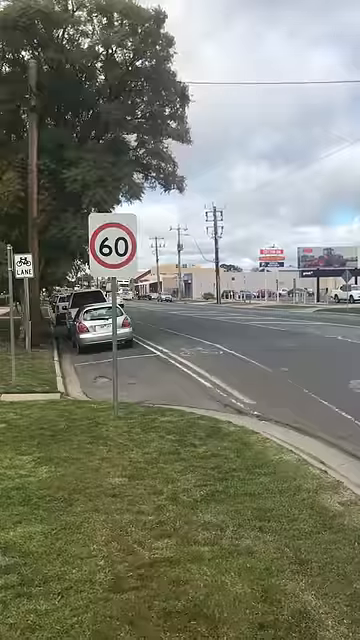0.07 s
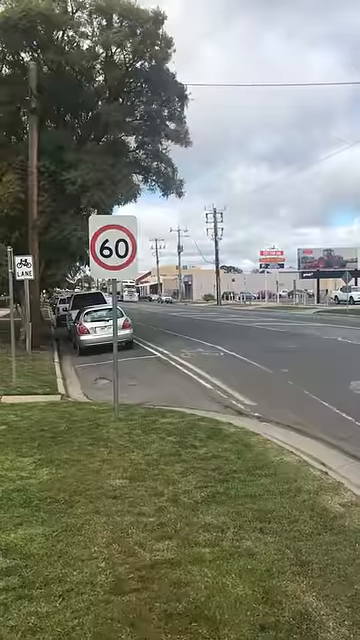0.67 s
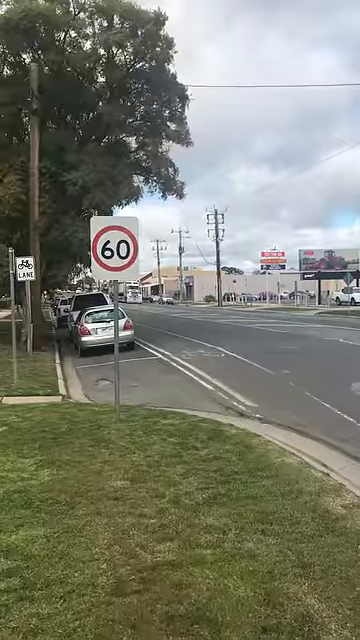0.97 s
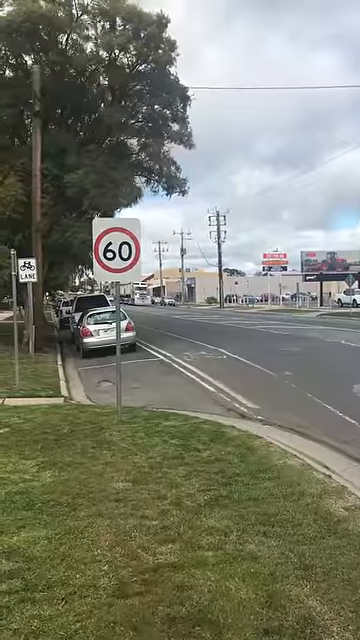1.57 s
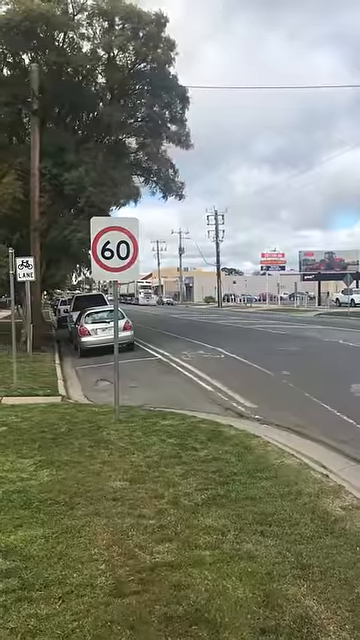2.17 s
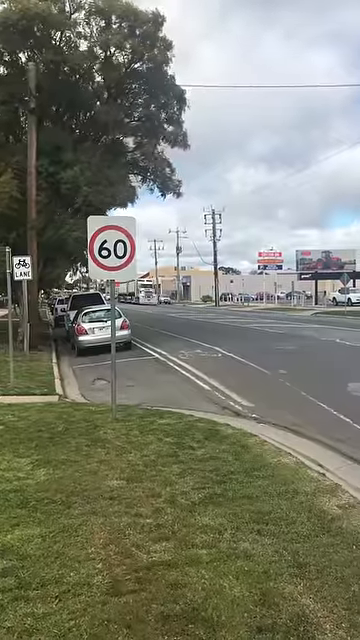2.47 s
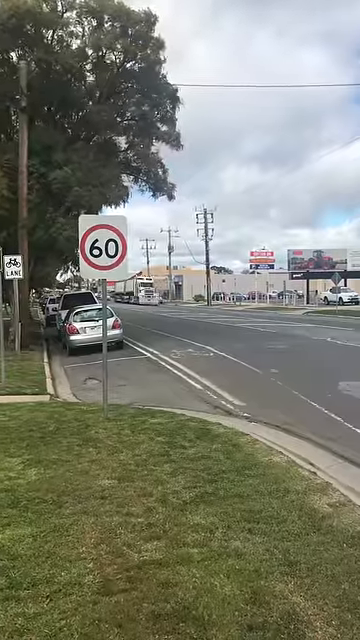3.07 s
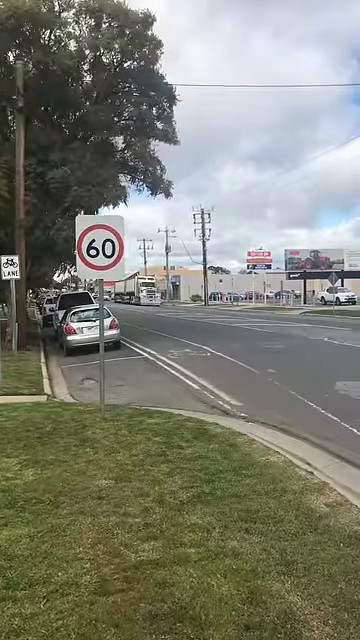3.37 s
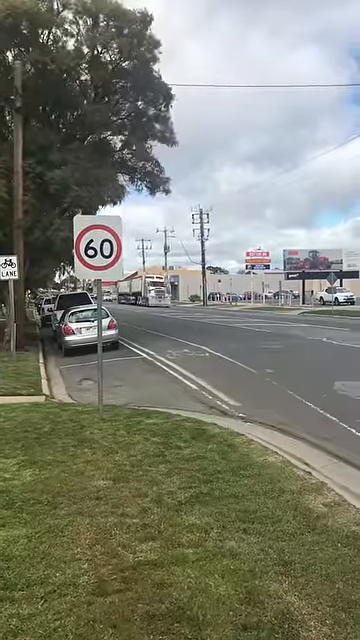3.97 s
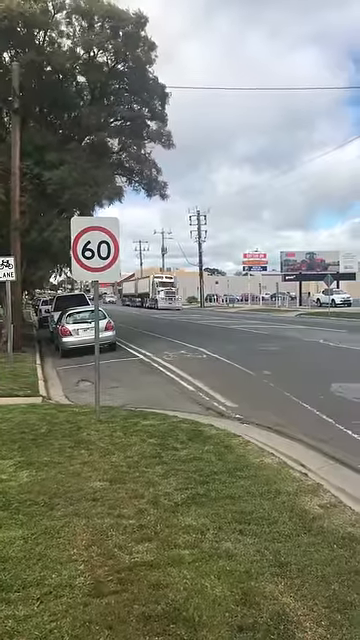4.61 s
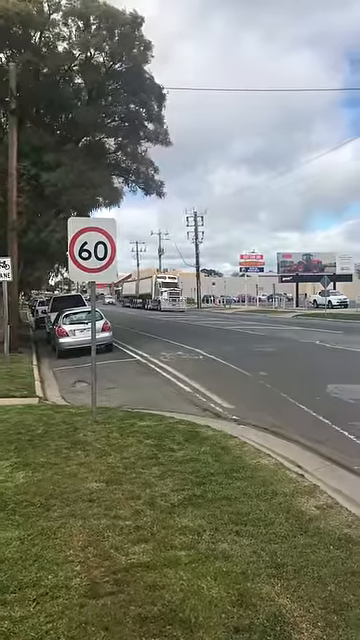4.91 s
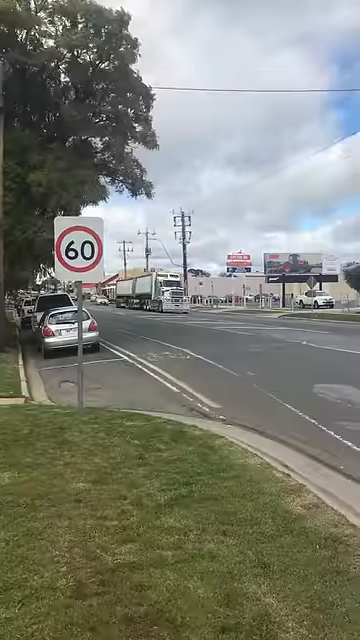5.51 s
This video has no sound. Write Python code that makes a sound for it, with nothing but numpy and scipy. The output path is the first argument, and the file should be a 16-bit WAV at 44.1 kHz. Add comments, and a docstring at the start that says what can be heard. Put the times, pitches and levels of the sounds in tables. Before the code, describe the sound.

On an open roadside, a dull roar of tyres and distant traffic runs throughout, with low wind rumble and the odd thump on the microphone. At about 0.5 seconds an approaching heavy truck opens its engine brake: a low, rough, pulsing drone that slowly sinks in pitch from about 1 second. A far bird gives three very faint chirps in the first two seconds. Between 2 and 3 seconds the drone brightens, then eases slightly, joined by singing tyres and faint, thin, high whines. Two soft spurts of air hiss at about 2.9 and 3.4 seconds. From 3 seconds the wind rises in ragged puffs right on the microphone, with heavy thumps after 4 seconds. It is loudest from about 4.5 to 5.1 seconds, crackling and burying the truck, then drops back somewhat by the end at about 5.6 seconds.

```python
"""On the grass verge of a town road, microphone out in the wind: tyre roar, distant traffic, a far bird.
Half a second in, a heavy truck coming down the road opens its engine brake; the exhaust drones, then
sags in pitch. It brightens as the truck comes into the open, with singing tyres, a few thin whines and
two spurts of air. From about three seconds the wind, until then a rumble and the odd thump on the
microphone, rises in ragged puffs that bury the truck and crackle at their height."""
import sys
import numpy as np
from scipy import signal
from scipy.fft import irfft, next_fast_len
from scipy.io import wavfile
from scipy.ndimage import uniform_filter1d

SR = 44100
rng = np.random.default_rng(int(sys.argv[2]) if len(sys.argv) > 2 else 0)


def output_pcm(signal):
    """Save a mono or channel-first signal as 16-bit PCM at the path in sys.argv[1].

    Samples are clipped to [-1, 1] before scaling.
    """
    pcm = np.clip(np.atleast_2d(signal).T, -1, 1) * 32767
    wavfile.write(sys.argv[1], SR, np.round(pcm).astype(np.int16))


N = 249165
TIME = np.arange(N) / SR
BRAKE_ON_S, BRAKE_ATTACK_S = 0.54, 0.032
GALE_DB = -20   # the wind strength that counts as a gale

# One long gust builds and dies down. Each row: time in seconds, strength in dB.
BREEZE = [(0, -74), (2.4, -60), (3.3, -49), (3.95, -38), (4.35, -34.5), (4.68, -21), (4.86, -26),
          (5.25, -29.5), (5.65, -49)]
# The strong puffs. Each row: centre in seconds, strength in dB, half length in seconds.
PUFFS = [(0.333, -46.5, 0.0095), (0.41, -37, 0.0027), (0.687, -47.5, 0.025), (1.426, -40, 0.0064),
         (2.425, -44, 0.036), (2.824, -35.5, 0.026), (2.916, -34, 0.0057), (3.139, -32.5, 0.019),
         (3.189, -21.5, 0.0048), (3.455, -22, 0.011), (3.515, -26, 0.0041), (3.579, -24.5, 0.0034),
         (3.665, -27, .004), (3.697, -20, 0.0022), (3.728, -26.5, .012), (3.801, -26, 0.0073),
         (3.855, -27.5, 0.012), (3.962, -23.5, .009), (4.01, -23, 0.0038), (4.153, -21.5, 0.014),
         (4.22, -19.5, 0.011), (4.346, -21, .008), (4.391, -19.5, 0.0044), (4.42, -18, 0.016),
         (4.46, -19.5, 0.0026), (4.5, -18.5, .004), (4.534, -18.5, 0.0041), (4.571, -18.5, 0.007),
         (4.616, -19.5, 0.017), (4.782, -18, 0.003), (4.837, -17, 0.014), (4.897, -19, 0.02),
         (4.993, -19, 0.011), (5.047, -18.5, .014), (5.08, -15.5, 0.0029), (5.1, -17, .004),
         (5.175, -20.5, 0.0049), (5.274, -19.5, 0.0027), (5.298, -18, 0.0021), (5.322, -20, 0.0041),
         (5.369, -20.5, 0.006), (5.475, -27.5, 0.027), (5.527, -21, 0.0067), (5.578, -25, 0.0082)]


def from_db(db):
    """Decibels to gain."""
    return 10 ** (np.asarray(db) / 20)


def rms_one(x):
    """Scale to unit power."""
    return x / np.sqrt(np.mean(x ** 2) + 1e-20)


def in_time(rows):
    """Each column of a curve at every sample; rows begin with a time in seconds."""
    times, *columns = np.transpose(rows)
    return [np.interp(TIME, times, column) for column in columns]


def at_hz(points, hz):
    """Read a table on a log-frequency axis."""
    freqs, values = np.transpose(points)
    return np.interp(np.log(hz), np.log(freqs), values)


def ramp(start, seconds):
    """Rise evenly from 0 to 1 and stay there."""
    return np.clip((TIME - start) / seconds, 0, 1)


def swells(rows):
    """Summed power of bell curves. Each row: centre in seconds, level in dB, half length in seconds."""
    power = np.zeros(N)
    for s, db, half in rows:
        near = slice(max(int((s - 5 * half) * SR), 0), int((s + 5 * half) * SR))
        power[near] += from_db(db) ** 2 * np.exp(-.5 * ((TIME[near] - s) / half) ** 2)
    return power


def drift(rate_hz):
    """Smooth random wander with a spread of 1."""
    hop, settle = 40, 2000
    pole = np.exp(-2 * np.pi * hop * rate_hz / SR)
    white = rng.standard_normal(N // hop + settle + 2)
    slow = signal.lfilter([1], [1, -2 * pole, pole * pole], white)[settle:]
    return np.interp(np.arange(N) / hop, np.arange(len(slow)), rms_one(slow))


def filtered(x, hz, kind, order=2):
    """Butterworth filter."""
    return signal.sosfilt(signal.butter(order, hz, kind, fs=SR, output="sos"), x)


def noise(colour):
    """Unit-power noise, falling away below the first row. Each row: frequency in Hz, relative dB."""
    hz = np.maximum(np.fft.rfftfreq(next_fast_len(N + N % 2), 1 / SR), 1)
    low_cut = 1 / (1 + (colour[0][0] / hz) ** 6)
    white = rng.standard_normal(len(hz)) + 1j * rng.standard_normal(len(hz))
    return rms_one(irfft(white * low_cut * from_db(at_hz(colour, hz)))[:N])


def evened(x, seconds):
    """Take out the swells slower than a given time."""
    power = uniform_filter1d(x * x, max(int(seconds * SR), 2))
    return x / np.sqrt(np.abs(power) + 1e-20)


def whine(hz, gain, width_hz):
    """A steady or gliding tone, smeared into a narrow band by the moving air."""
    phase = 2 * np.pi * np.cumsum(hz * np.ones(N)) / SR
    return gain * (drift(width_hz) * np.cos(phase) + drift(width_hz) * np.sin(phase))


def road(roar_db=-40.5, hiss_trim_db=3.5, fine_trim_db=1.5, flicker_db=0.5):
    """Tyres and far traffic: a dull roar, a hiss and a fine top."""
    # The colours of the three layers. Each row: frequency in Hz, relative level in dB.
    roar_colour = [(40, 8.5), (80, 9), (200, -5), (300, 0.5), (420, -2), (650, 0.5), (900, 1), (1200, 0),
                   (1450, -6.5), (1750, -19.5), (3000, -53.5)]
    hiss_colour = [(1000, -7), (1600, 4.5), (2050, 3), (2400, -1.5), (3200, -0.5), (4000, -5.5),
                   (4900, -10), (5800, -8), (6800, -25), (9000, -49.5)]
    fine_colour = [(4500, -10.5), (6500, 7), (8000, 1), (9600, -0.5), (10400, -10), (12000, -8),
                   (15500, -16.5)]
    # The road's treble. Each row: time in seconds, hiss and fine hiss in dB before their trims.
    treble = [(0.05, -56.5, -73.5), (1.2, -54, -69.5), (1.97, -54.5, -68), (3.0, -53, -63.5),
              (3.76, -53, -67), (4.2, -56, -68.5), (4.7, -58, -69), (4.98, -52.5, -63.5),
              (5.34, -54.5, -68), (5.65, -51, -61)]
    hiss_db, fine_db = in_time(treble)
    build_db = ramp(0, 1.0) - 1   # the roar builds as the truck comes into the open
    layers = [(roar_db + build_db, roar_colour),
              (hiss_db + hiss_trim_db, hiss_colour),
              (fine_db + fine_trim_db, fine_colour)]
    return sum(from_db(db + flicker_db * drift(16)) * noise(colour) for db, colour in layers)


def far_bird(waver_db=3):
    """Each note swells and fades, a little unsteadily, while it curls upwards."""
    # Each row: start and length in seconds, starting pitch and rise in Hz, level in dB.
    notes = [(.37, .125, 5290, 900, -63), (1.13, .11, 5220, 120, -70), (1.77, .15, 5230, 180, -64.5)]
    out, waver = np.zeros(N), waver_db * drift(40)
    for start, length, hz, rise_hz, db in notes:
        along = ramp(start, length)
        phase = 2 * np.pi * np.cumsum(hz + rise_hz * along ** 2) / SR
        arch = np.sqrt(4 * along * (1 - along))
        out += from_db(db + waver) * arch * np.sin(phase)
    return out


def wind_rumble(trim_db=-0.5, lumpy_db=3.5, wake_lag_s=0.014, wake_half_s=0.0083):
    """Large slow eddies press on the microphone port, at random and in the wake of each puff."""
    # The deep rumble. Each row: time in seconds, level in dB before the trim.
    levels = [(0, -35.5), (2.4, -34), (2.58, -43), (2.85, -30.5), (3.33, -41), (3.5, -28.5), (4.55, -28.5),
              (5.0, -21), (5.65, -29.5)]
    level_db, = in_time(levels)
    wakes = swells([(s + wake_lag_s, -21.5 + 0.12 * (db - GALE_DB), wake_half_s) for s, db, _ in PUFFS])
    lumps = from_db(level_db + lumpy_db * drift(14))
    eddies = noise([(28, -24), (37, -13.5), (48, -1.5), (66, -6.5), (85, -4.0), (120, -15.5),
                    (180, -21.5), (300, -46), (800, -77.5)])
    return from_db(trim_db) * np.sqrt(lumps ** 2 + wakes) * evened(eddies, 0.51)


def wind_strength(flurries_per_s=16, over_breeze_db=3.5, spread_db=2.5, flurry_half_s=0.0017):
    """Breeze, strong puffs and small random flurries together, in dB above a gale."""
    breeze_db, = in_time(BREEZE)
    centres = np.flatnonzero(rng.random(N) < flurries_per_s / SR)
    sizes_db = breeze_db + over_breeze_db + spread_db * rng.uniform(-1.1, 1, N)
    flurries = [(TIME[i], sizes_db[i], flurry_half_s) for i in centres]
    return 10 * np.log10(from_db(breeze_db) ** 2 + swells(PUFFS) + swells(flurries)) - GALE_DB


def wind_buffeting(trim_db=4.0, flicker_db=1.3):
    """Faster air sheds smaller eddies, so each puff is brighter as well as louder."""
    # The wind's colour in a gale. Each row: frequency in Hz, relative level in dB.
    gale_colour = [(50, -3.5), (90, 4.5), (160, 6), (240, 6), (340, 1), (430, 4), (590, 1.5), (730, -10.5),
                   (1050, -15.5), (1400, -26.5), (1900, -36.5), (2700, -48.5), (4000, -60.5), (8000, -66)]
    # How steeply each band follows the wind. Each row: frequency in Hz, dB per dB of strength.
    steepness = [(60, 0.26), (160, 0.5), (300, 0.66), (600, 2.33), (2000, 3)]
    strength_db = wind_strength() + flicker_db * drift(120)
    edges_hz = 50 * 2 ** np.arange(0, 7.1, .5)   # half octaves
    turbulence = [noise(gale_colour), noise(gale_colour)]   # neighbouring bands stay independent
    out = np.zeros(N)
    for k, (low, high) in enumerate(zip(edges_hz, edges_hz[1:])):
        hz = np.sqrt(low * high)
        band = filtered(turbulence[k % 2], [low, high], "band", order=3)
        steady = np.std(band) * evened(band, .008 + 2 / hz)
        out += steady * from_db(at_hz(steepness, hz) * strength_db)
    return from_db(GALE_DB + trim_db) * out


def wind_thumps():
    """A lone eddy sweeping over the port is one swing of pressure between two dips."""
    # Each row: centre in seconds, peak in dB, pitch in Hz.
    eddies = [(0.404, -13, 187), (.698, -44, 189), (1.433, -15.5, 211), (3.188, -11, 200),
              (3.459, -17, 377), (4.15, -2, 198), (4.211, -3, 250), (4.641, -7, 226), (4.9, -2.5, 208),
              (4.936, -4, 176), (5.296, -22, 320), (5.532, -11, 127)]
    out = np.zeros(N)
    for s, db, hz in eddies:
        near = slice(int((s - 2 / hz) * SR), int((s + 2 / hz) * SR))
        offset_squared = (np.pi * hz * (TIME[near] - s)) ** 2
        out[near] += from_db(db) * (1 - 2 * offset_squared) * np.exp(-offset_squared)
    return out


def wind_cracks(body_hz=1100, edge_hz=3200, strong_trim_db=3, small_db=-25, gale_clicks_per_s=120):
    """An eddy breaking on the port is a sudden step of pressure; small ones crowd in near a gale."""
    # The strongest eddies. Each row: time in seconds, relative level in dB.
    strong_cracks = [(4.6052, -16), (4.6157, -9.5), (4.627, -17), (4.644, -31), (4.678, -23), (4.7292, -21),
                     (4.8255, -17), (4.8825, -18), (4.893, -14.5), (5.097, -16)]
    breeze_db, = in_time(BREEZE)
    strength = from_db(breeze_db - GALE_DB)
    breaks = rng.random(N) < gale_clicks_per_s * strength / SR
    clicks = breaks * rng.standard_normal(N) * strength * from_db(small_db)
    for s, db in strong_cracks:
        clicks[round(s * SR)] = from_db(db + strong_trim_db)
    steps = filtered(clicks + 1e-18, [body_hz / 2, body_hz], "band", order=1) * SR / (np.pi * body_hz)
    softened = filtered(steps, edge_hz, "low")
    return filtered(softened, 5200, "low", order=4)


def air_spurts():
    """Air escapes from the truck in a smooth, bright hiss."""
    # Each row: centre in seconds, level in dB, half length in seconds.
    spurts = [(2.89, -53, .08), (3.39, -54, 0.038)]
    hiss = noise([(2500, 8.0), (3500, 2), (5500, -4.5), (8000, -16), (11000, -26), (15000, -46)])
    return np.sqrt(swells(spurts)) * hiss


def truck_whines(whistle_hz=5900, whistle_db=-76, waver_db=5):
    """The turbocharger, a higher whine that climbs and falls, and a faint whistle under braking."""
    # The two gliding whines. Each row: time in seconds, pitch in Hz, level in dB.
    turbo_glide = [(1.8, 7860, -100), (2.4, 8100, -76), (3.0, 8320, -74), (3.5, 8380, -76.5),
                   (5.05, 8370, -77), (5.65, 8160, -69)]
    high_glide = [(1.5, 11200, -101), (2.3, 14180, -73), (2.5, 14290, -69), (2.75, 14260, -77),
                  (3.03, 14250, -75), (3.85, 11400, -92)]
    # The turbocharger flares briefly. Each row: centre in seconds, level in dB, half length in seconds.
    flares = [(3.17, -65, 0.062), (3.41, -61, 0.027), (5.25, -66, 0.029)]
    turbo_hz, turbo_db = in_time(turbo_glide)
    high_hz, high_db = in_time(high_glide)
    turbo_gain = np.sqrt(from_db(turbo_db) ** 2 + swells(flares))
    whistle_gain = ramp(BRAKE_ON_S, BRAKE_ATTACK_S) * from_db(whistle_db + waver_db * drift(5))
    return (whine(turbo_hz, turbo_gain, width_hz=64)
            + whine(high_hz, from_db(high_db), width_hz=60)
            + whine(whistle_hz, whistle_gain, width_hz=60))


def tyres(hum_db=-44.5):
    """The tread sings, loudest and highest in the bend, where a hum joins it an octave below."""
    # Each row: time in seconds, pitch in Hz, level in dB.
    song = [(0, 1308, -57), (1.25, 1332, -46.5), (2.35, 1327, -50), (3.25, 1336, -42.5), (4.0, 1326, -47),
            (5.65, 1287, -49)]
    hz, level_db = in_time(song)
    hum_gain = from_db(hum_db) * ramp(start=2.12, seconds=0.58)
    return whine(hz, from_db(level_db), width_hz=48.5) + whine(hz / 2, hum_gain, width_hz=85)


def exhaust(brake_db=-36.5, ease_db=-4, flutter_db=1.7, jitter=0.0011, rasp_db=-17, bark_db=-20):
    """Each cylinder dumps compressed air into the pipe; sinking orders boom through its resonances."""
    # The low orders that carry to the verge. Each row: multiple of the crank rate, relative level in dB.
    orders = [(2, -22), (3, -1.5), (4, -13), (4.5, -20.5), (5, -4.5), (6, -6), (7, -27), (8, -1.5), (9, -1),
              (10, -5.5), (11, -5), (12, -12), (13, -10), (14, -14.5)]
    # The pipe's resonances. Each row: centre and half width in Hz, boost in dB.
    resonances = [(82.6, 1.9, 6.5), (136.8, 4.4, 7.5), (156.14, 6.2, 17), (216.8, 2.1, 7)]
    # The engine runs steadily, then the brake drags it down at an even rate.
    steady_hz, slows_from_s, sag_hz_per_s = 28.17, .9, .84
    crank_hz = steady_hz - sag_hz_per_s * np.maximum(TIME - slows_from_s, 0)
    crank_angle = 2 * np.pi * np.cumsum(crank_hz * (1 + jitter * drift(2.6))) / SR
    # The upper orders are muffled until the truck comes into the open.
    muffled_above_hz = 265
    muffled_db = -9 * (1 - ramp(start=1.7, seconds=1.0))
    drone = np.zeros(N)
    for order, order_db in orders:
        pipe_db = sum(db / (1 + ((order * crank_hz - hz) / width) ** 4) for hz, width, db in resonances)
        is_upper = order * steady_hz > muffled_above_hz
        gain = from_db(order_db + pipe_db + muffled_db * is_upper + flutter_db * drift(1.9))
        drone += np.sqrt(2) * gain * np.cos(order * crank_angle + rng.uniform(0, 2 * np.pi))
    # The brake's bark, a hiss gated by the blasts. Each row: frequency in Hz, relative level in dB.
    bark_colour = [(1500, -5.5), (2100, 2.5), (2500, -5), (3200, -11), (4500, -32.5)]
    blasts = 1 + np.cos(3 * crank_angle)   # turbulent gas comes with every blast, three to a turn
    rasp = rms_one(blasts * filtered(rng.standard_normal(N), [110, 290], "band", order=3))
    bark = rms_one(blasts * noise(bark_colour))
    # The brake opens, holds, then eases a little.
    level_db = brake_db + ease_db * ramp(start=2.65, seconds=0.52)
    brake = ramp(BRAKE_ON_S, BRAKE_ATTACK_S) * from_db(level_db)
    return brake * (drone + from_db(rasp_db) * rasp + from_db(bark_db) * bark)


def scene():
    """Truck, road and bird far off, wind right on the one microphone."""
    truck = exhaust() + air_spurts() + tyres() + truck_whines()
    wind = wind_rumble() + wind_buffeting() + wind_thumps() + wind_cracks()
    return (truck + road() + far_bird() + wind)[None]


def record(dry, low_cut_hz=30, high_cut_hz=15750):
    """The microphone opens after a moment, sheds the deepest bass, rounds peaks and loses the top."""
    opened = ramp(start=.034, seconds=.003)
    rounded = np.tanh(opened * filtered(dry, low_cut_hz, "high", order=4))
    return signal.sosfilt(signal.ellip(10, .1, 80, high_cut_hz, fs=SR, output="sos"), rounded)


dry = scene()
out = record(dry)
output_pcm(out)
```